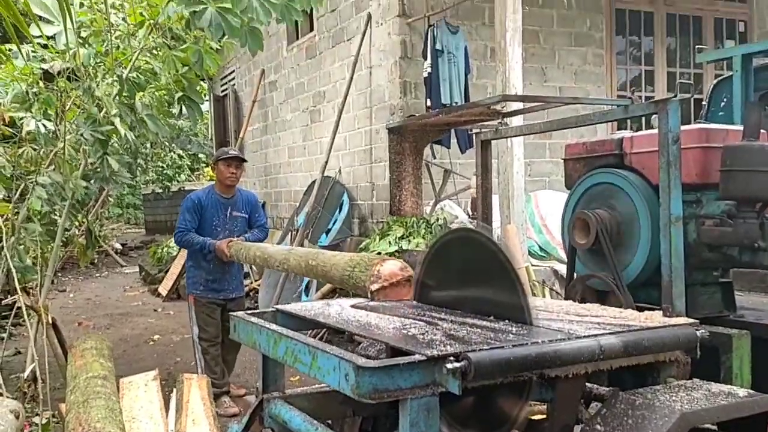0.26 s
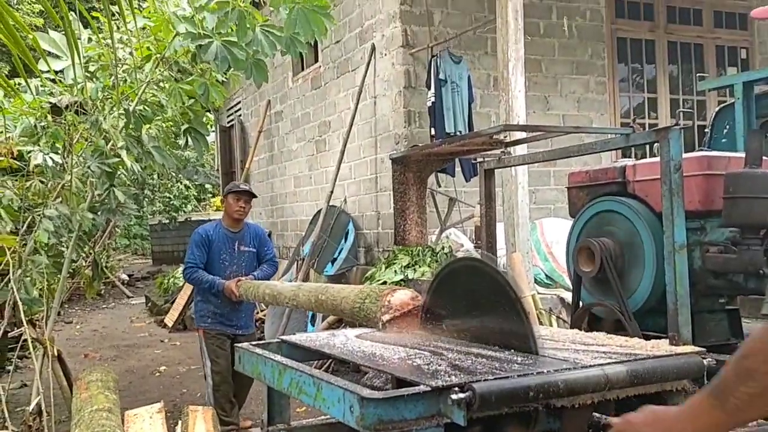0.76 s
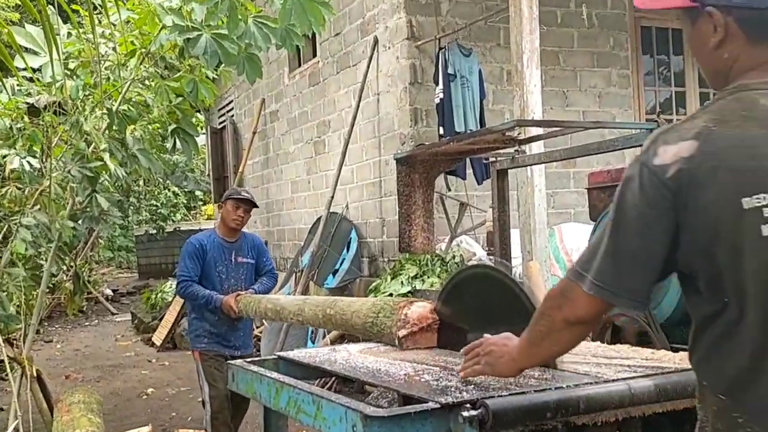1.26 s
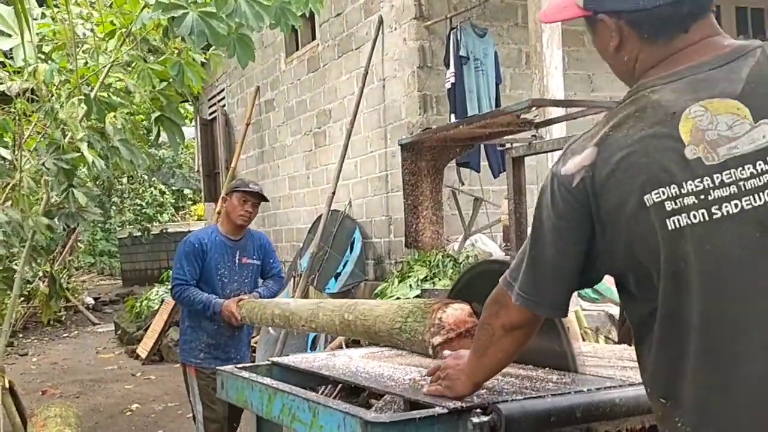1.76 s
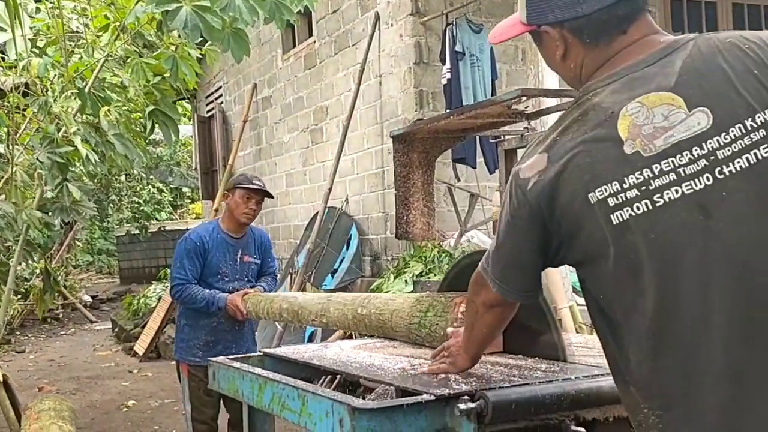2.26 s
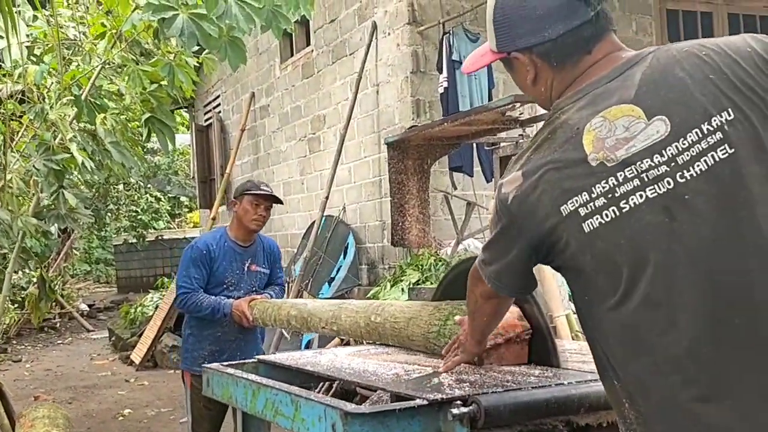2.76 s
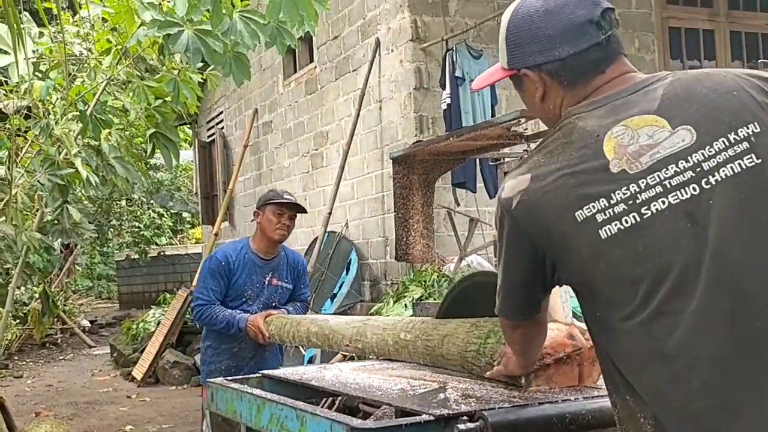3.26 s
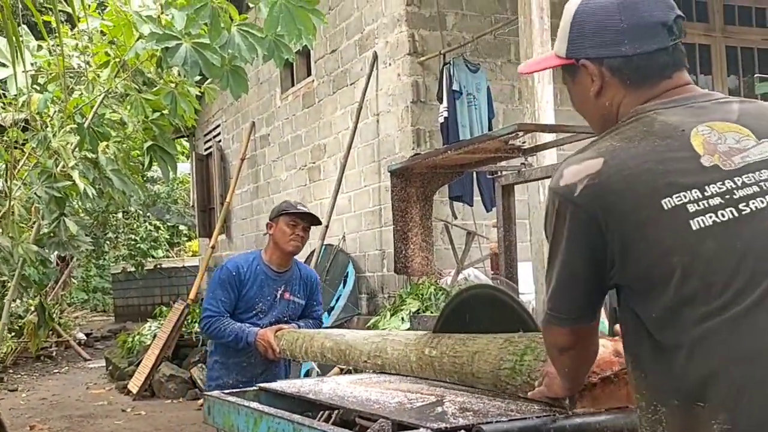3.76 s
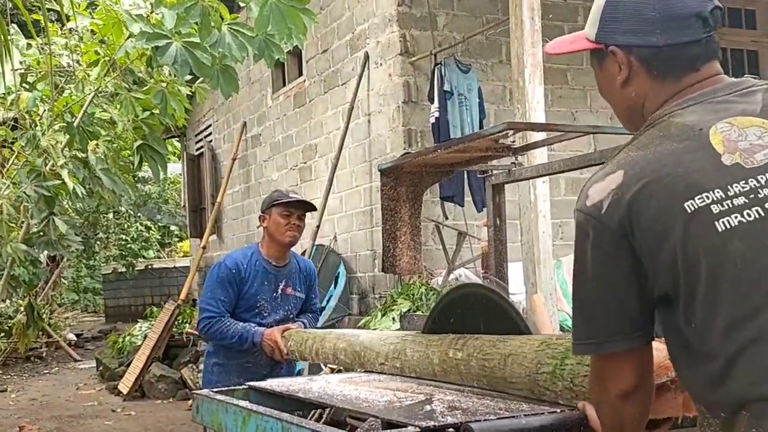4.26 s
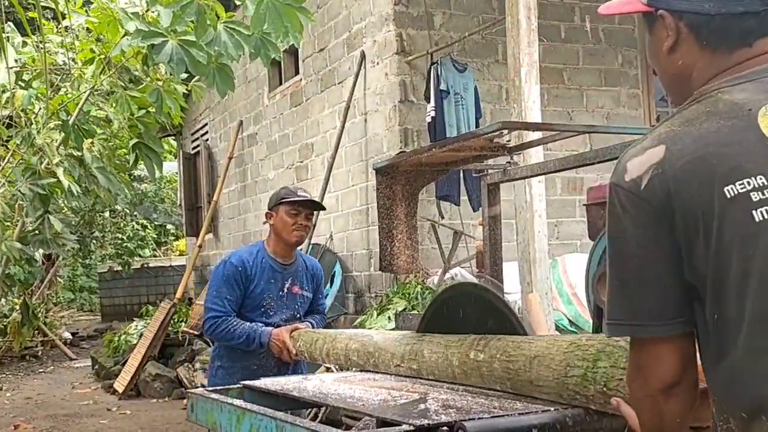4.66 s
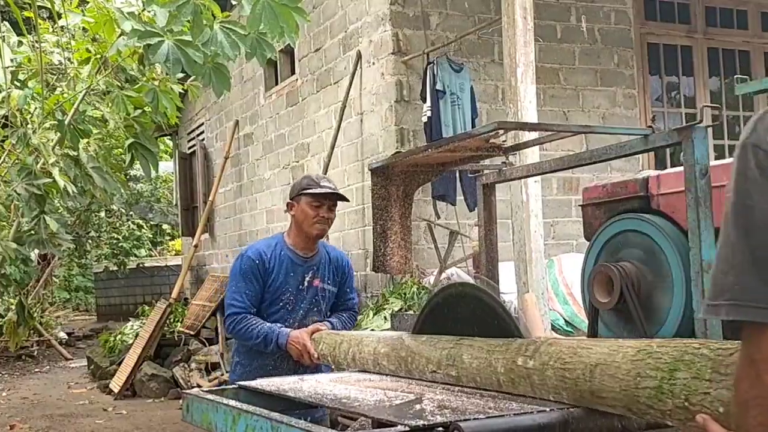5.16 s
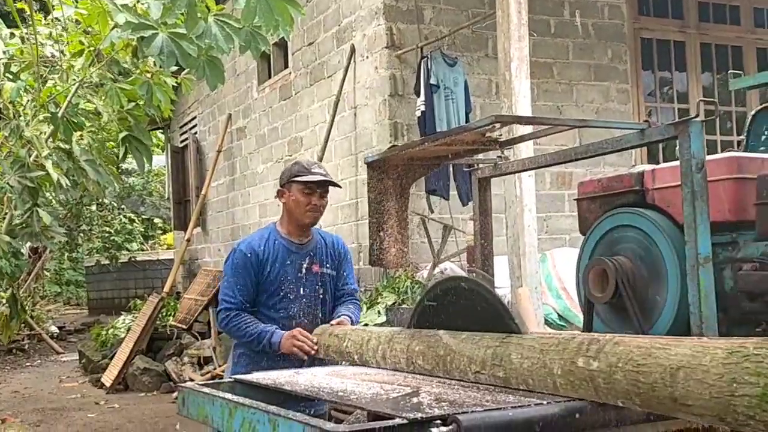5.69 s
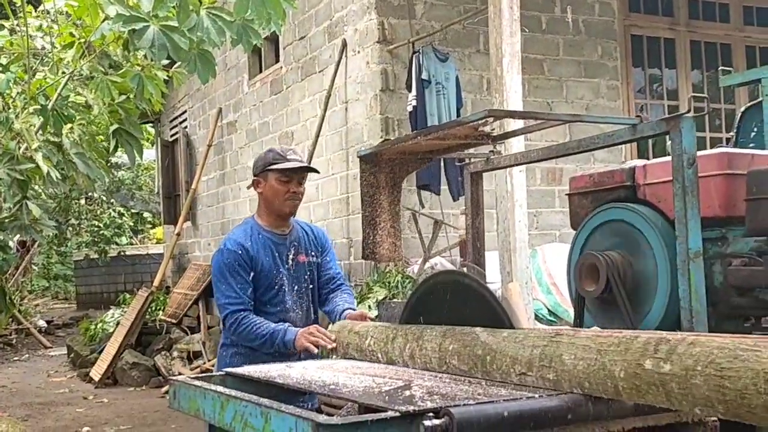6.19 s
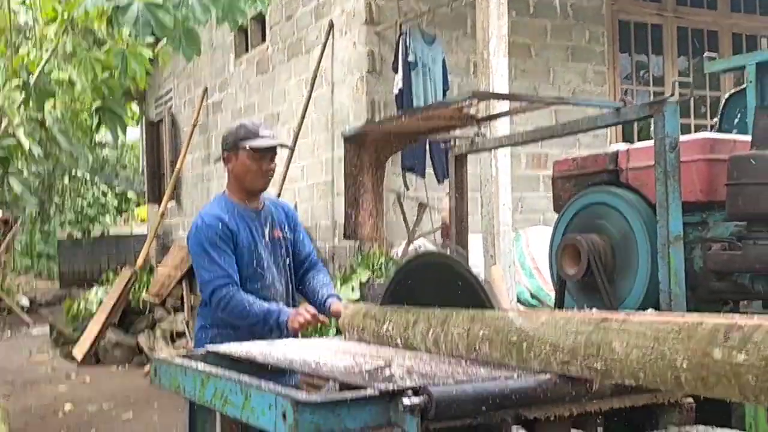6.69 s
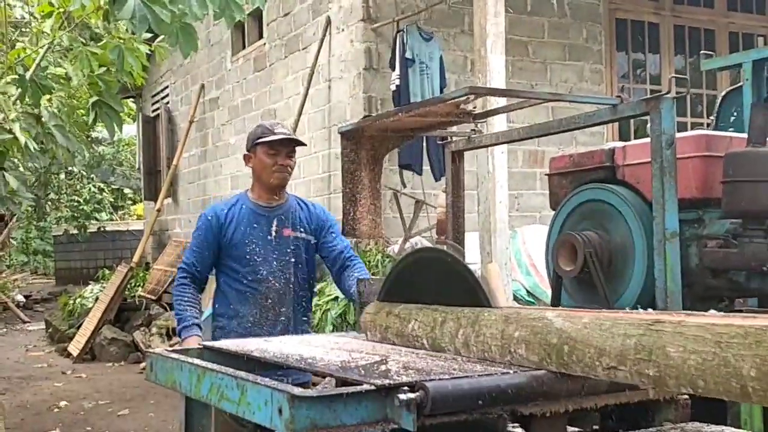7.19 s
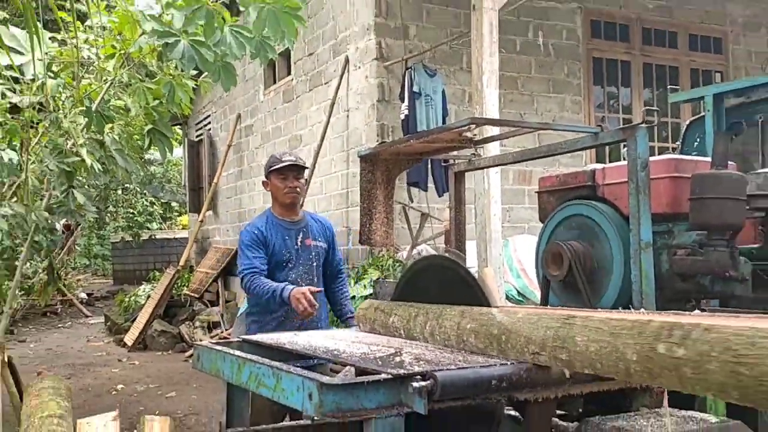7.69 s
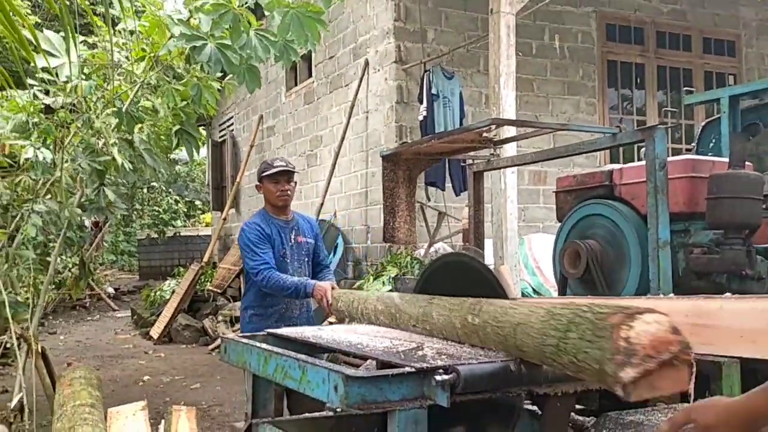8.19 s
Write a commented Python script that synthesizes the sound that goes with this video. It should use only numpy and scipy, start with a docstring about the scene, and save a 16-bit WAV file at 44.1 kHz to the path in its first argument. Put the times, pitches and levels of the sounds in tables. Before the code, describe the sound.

A single-cylinder diesel engine runs close by in an outdoor yard, thumping about twelve times a second with a metallic knock, gear and belt rattle and a wavering ring. Over it, from start to finish, a large circular saw hisses through a log, slightly to the right. At around 1.5 seconds the engine slows a little under load, and from 1.7 seconds its exhaust barks harder and unevenly, with a few sharp cracks until about 3 seconds. The labouring chug and the hiss continue, the hiss swelling briefly now and then. From about 5.7 to 8 seconds the log scrapes against the blade in several short, high rasps, and the blade rings thinly around 6.3 seconds and again from 7.3 seconds. From about 7 seconds the barking eases, the engine regains speed and its rattle grows louder, while the sawing moves to the centre.

```python
"""Diesel-driven circular saw ripping a log

A single-cylinder diesel belt-drives the blade in a yard beside a block wall. Each cycle brings an
exhaust thump, a rasping bark, an intake gulp and a combustion knock, over gear rattle and a wavering
engine ring. Under load the engine slows and barks harder. The teeth hiss in the wood, with brief swells,
and keep the blade ringing; the log scrapes now and then. A compressor ducks the loud barks."""
import sys
import numpy as np
from scipy import signal
from scipy.fft import irfft, next_fast_len
from scipy.io import wavfile
from scipy.ndimage import uniform_filter1d

SR = 44100
rng = np.random.default_rng(int(sys.argv[2]) if len(sys.argv) > 2 else 0)


def unload_audio(sound):
    """Save the sound as a 16-bit wav file, at the path given as the first command line argument."""
    columns = np.transpose(np.atleast_2d(sound))
    # keep every value between -1 and 1, then stretch to whole-number steps
    steps = np.round(np.clip(columns, -1, 1) * 32767)
    wavfile.write(sys.argv[1], SR, steps.astype(np.int16))


N = 372204
TIME_S = np.arange(N) / SR
N_FFT = next_fast_len(N, True)
FREQS_HZ = np.maximum(np.fft.rfftfreq(N_FFT, 1 / SR), 1)

# left-right coherence of noise: f/Hz, coherence
COHERENCE = [(30, 1), (100, 1), (350, 0.99), (650, 0.93), (1000, 0.65), (1600, 0.034), (15000, 0.035)]
# engine speed; sags under load, hunts under the governor: t/s, firing rate/Hz
FIRING_RATE = [(0.0, 12.118), (0.6, 12.013), (0.95, 11.989), (1.25, 11.701), (1.55, 11.284), (2.1, 11.281),
               (2.35, 11.813), (2.8, 11.618), (3.25, 11.64), (3.5, 11.827), (3.75, 11.66), (4.35, 11.957),
               (4.75, 11.676), (5.1, 11.742), (5.55, 11.944), (5.95, 11.724), (6.2, 11.914), (6.5, 11.773),
               (7.0, 11.932), (7.35, 12.331), (7.9, 12.169), (8.44, 12.256)]
# running noise of engine and belt drive: t/s, level/dB
RUNNING_LEVEL = [(0.15, -32), (1.58, -40), (2.4, -36), (2.7, -35.5), (3.6, -35.5), (4.0, -38), (4.5, -36.5),
                 (6.3, -36.5), (6.88, -33.5), (7.6, -29.5), (8.44, -30)]
# exposure of the inlet side to the listener: t/s, gain/dB
INLET_EXPOSURE = [(.4, 2.5), (1.2, 2.5), (1.8, -0.5), (5, 0.5), (6.9, -6), (8.4, -5.5)]
# gear and belt rattle: f/Hz, level/dB
RATTLE_SPECTRUM = [(15, -5), (35, 10), (110, 8.5), (300, 1), (420, -1), (700, 5.5), (1100, 3), (2000, 4),
                   (3000, -27), (5000, -38), (8000, -44), (15000, -41)]
# engine block ring: f/Hz, width/Hz, level/dB
BLOCK_MODES = [(839, 44, 2.5), (1021, 103, -4.5), (1547, 99, 0.5)]
# intake pipe ring: f/Hz, level/dB, t60/s
INTAKE_MODES = [(179.3, -9.5, 0.19), (266.4, 9, 0.049)]
# combustion knock and piston slap: f/Hz, level/dB, t60/s
KNOCK_MODES = [(703, -13, 0.032), (845, -1, 0.02), (980, -6, 0.039), (1470, -16, 0.014)]
# exhaust stroke strength: t/s, thump/dB, bark/dB
EFFORT = [(0, -35, -37), (.44, -32, -39), (.52, -20.5, -40), (1.2, -23.5, -44), (1.72, -22, -25.5),
          (2.3, -19.5, -21.5), (2.55, -19, -24), (3.15, -20, -22.5), (3.95, -20, -23.5), (4.5, -22.5, -25),
          (5.3, -21, -24), (5.55, -22, -27), (5.75, -24, -33.5), (6.15, -22.5, -23.5), (6.95, -22.5, -27),
          (7.3, -22, -32), (7.55, -23, -36), (8.1, -18.5, -29), (8.44, -28, -33)]
# single strokes the governor over- or underfuels: t/s, bark change/dB, thump change/dB
ODD_STROKES = [(0.03, -11, 11), (0.27, 11, 6), (0.69, 12, -12), (0.94, 0, -1.5), (1.19, -7, -3),
               (1.36, 7, 0), (1.54, 6, 1.5), (1.63, -5, 0.5), (1.72, -1.5, -1), (2.58, -8, -2),
               (2.67, -6, -0.5), (2.84, 1, -1.5), (3.01, -24, 1.5), (3.27, -21, -1), (3.53, -13, 0.5),
               (3.7, -6, 0), (4.38, -4, 0), (4.46, -16, 0.5), (4.63, -17, -1), (5.05, -6.5, 1.5),
               (5.65, -3.5, -1), (5.9, 4, 0), (6.32, -24, -4), (6.41, -10, -0.5), (6.75, 2.5, 0),
               (6.83, -5, -4), (7.08, 2, -3), (7.33, 6, 1), (7.41, -2, 2.5), (7.57, -13, 1), (7.66, 3, 1.5),
               (7.74, 2, -6), (7.82, 4, -9), (7.9, 0, 2.5), (8.07, -19, -5), (8.15, -6, 2.5),
               (8.31, -11, -11)]
# strokes with a fully steep front: t/s
STEEP_STROKES = [1.72, 2.76, 3.36, 4.55, 4.72, 5.14, 5.48, 6.24]
# exhaust jet rasp: f/Hz, level/dB
BARK_SPECTRUM = [(300, 5), (600, 1), (950, 8.5), (1200, -8), (1420, 18), (1850, 10.5), (3000, 11),
                 (5200, 6.5), (6500, -1), (8200, -17), (10200, -14), (15000, -36)]
# cracks at the silencer mouth: t/s, level/dB, f/Hz
CRACKS = [(1.72, -20.5, 2700), (2.245, -21, 2100), (2.33, -17.5, 2100), (2.417, -19, 5250),
          (3.1, -23.5, 1430)]
# log scrapes the blade or bumps the table: t/s, t60/s, level/dB, f/Hz
SCRAPES = [(5.685, 0.18, -25.5, 4400), (5.785, 0.25, -23, 4280), (6.41, 0.34, -22.5, 4150),
           (6.823, 0.077, -19.5, 4200), (7.507, 0.06, -21, 1400), (7.527, 0.098, -20.5, 4320),
           (7.59, .09, -26, 1350), (7.64, 0.29, -19.5, 4000), (7.815, 0.18, -25, 3700),
           (7.965, 0.16, -23.5, 4100)]
# log feed: t/s, hiss level/dB, top re body/dB
FEED = [(0, -27.5, -7.5), (.6, -26, -3.5), (1.0, -28, 1.5), (1.35, -28.5, 1.5), (1.7, -27.5, -2.5),
        (2.37, -25, -5), (3.4, -26.5, -4), (4.2, -26, -5.5), (4.9, -25.5, -1.5), (6.0, -26.5, -6),
        (6.6, -26.5, -4.5), (7.04, -25, -8.5), (7.14, -29.5, -16), (7.6, -27, -7), (8.2, -28.5, -10.5),
        (8.44, -30, -5)]
# brief swells of the saw hiss, mostly where a bark is weak: t/s, length/s, boost/dB
HISS_SWELLS = [(0.4, 0.15, 1.5), (1.08, 0.18, 0.5), (2.56, 0.4, 1.5), (3.523, 0.3, 2.5), (4.44, 0.12, 1),
               (5.683, 0.15, 2), (5.966, 0.12, 1.5), (6.365, 0.12, 0.5)]
# tooth hiss, body: f/Hz, level/dB
HISS_BODY_SPECTRUM = [(400, -28), (1200, -11), (2300, -2.5), (3100, 0.5), (3900, 3.5), (4800, 0.5),
                      (5800, -14), (7000, -15.5), (8200, -23.5), (11000, -29), (15000, -38)]
# tooth hiss, top: f/Hz, level/dB
HISS_TOP_SPECTRUM = [(3200, -17.5), (4400, 0.5), (5300, 4.5), (5900, 0.5), (7200, -10.5), (8200, -32),
                     (9200, -25.5), (10300, -18), (13500, -21.5), (15500, -29)]
# saw blade ring: f/Hz, width/Hz, level/dB
BLADE_MODES = [(2660, 180, -9), (3630, 125, -12), (4540, 190, -12.5), (5250, 860, -14.5)]
# log pinches the blade: peak t/s, half-width/s, mode f/Hz, boost/dB
PINCHES = [(2.74, 0.18, 2660, 3), (6.3, 0.15, 4540, 12), (6.4, 0.45, 3630, 3.5), (7.316, 0.18, 3630, 8),
           (8.0, 0.46, 3630, 10)]
# pan as the listener turns: t/s, right boost and left cut/dB
PAN = [(1.2, 1), (2.0, 0.93), (6.8, 0.65), (8.2, -0.11)]


def from_db(db):
    """Decibels to gain."""
    return np.exp(np.asarray(db) * (np.log(10) / 20))


def unit_rms(x):
    """Scale to unit power."""
    return x / np.sqrt(np.mean(x ** 2) + 1e-20)


def in_time(rows):
    """Table columns at every sample."""
    t_s, *columns = np.transpose(rows)
    return np.squeeze([np.interp(TIME_S, t_s, column) for column in columns])


def at_hz(rows):
    """Table at every FFT bin."""
    hz, value = np.transpose(rows)
    return np.interp(np.log(FREQS_HZ), np.log(hz), value)


def drift(rate_hz):
    """Random wander, unit RMS."""
    knots = rng.standard_normal(int(N / SR * rate_hz) + 2)
    return unit_rms(np.interp(TIME_S * rate_hz, np.arange(len(knots)), knots))


def noise(response):
    """Shaped stereo noise, unit RMS; coherent bass, diffuse treble."""
    mid, side = rng.standard_normal((2, 2 * len(FREQS_HZ))).view(complex)
    coherence = np.clip(at_hz(COHERENCE), -1, 1)
    spectrum = np.sqrt(1 + coherence) * mid + np.sqrt(1 - coherence) * side * [[1], [-1]]
    return unit_rms(irfft(response * spectrum, N_FFT)[:, :N])


def resonances(modes):
    """Response of parallel resonators, alternating in sign."""
    return sum((-1) ** k * from_db(db) / (1 + 1j * (FREQS_HZ ** 2 - hz ** 2) / (FREQS_HZ * width_hz))
               for k, (hz, width_hz, db) in enumerate(modes))


def delayed(x, delay_s):
    """Fractional delay."""
    return np.interp(TIME_S - delay_s, TIME_S, x, left=0)


def swell(clicks, rise_s, t60_s):
    """Attack-decay envelope per click."""
    age_s = TIME_S[:SR // 4]
    shape = (1 - np.exp(-age_s / rise_s)) * from_db(-60 * age_s / t60_s)
    return signal.oaconvolve(clicks, shape / shape.max())[:N]


def puff(clicks, width_s):
    """Gaussian gas pulse per click."""
    return signal.oaconvolve(clicks, signal.windows.gaussian(SR // 50, width_s * SR), "same")


def ring(clicks, hz, t60_s):
    """Decaying sine per click."""
    r, w = from_db(-60 / (t60_s * SR)), 2 * np.pi * hz / SR
    return signal.lfilter([0, np.sin(w)], [1, -2 * r * np.cos(w), r * r], clicks + 1e-18)


def pipe(x, hz, q):
    """Open pipe: resonant high-pass, radiates no steady flow."""
    w = 2 * np.pi * hz
    return signal.lfilter(*signal.bilinear([1, 0, 0], [1, w / q, w * w], SR), x)


def cycle_starts_s(first_s=0.0247):
    """Exhaust valve openings, one per cycle."""
    t_s, rate_hz = np.transpose(FIRING_RATE)
    clock_s = np.linspace(0, N / SR, 4000)
    cycles = np.cumsum(np.interp(clock_s, t_s, rate_hz)) * clock_s[1]
    cycles -= np.interp(first_s, clock_s, cycles)
    return np.interp(np.arange(int(cycles[-1]) + 1), cycles, clock_s)


def strokes(phase, gains):
    """One click per cycle; phase in cycles after the exhaust valve opens."""
    starts_s = cycle_starts_s()
    at = np.round((starts_s + phase * np.gradient(starts_s)) * SR).astype(int)
    inside = (at >= 0) & (at < N)
    return np.bincount(at[inside], gains[inside], N)


def uneven(spread_db):
    """Random gain per cycle."""
    return from_db(spread_db * rng.standard_normal(len(cycle_starts_s())))


def nearest_stroke(t_s):
    """Per-cycle mask: 1 at the stroke nearest t_s."""
    gap_s = np.abs(cycle_starts_s() - t_s)
    return 1.0 * (gap_s == gap_s.min())


def reflected(x, gain, paths_s=(0.0009, 0.0023, 0.0041)):
    """Comb from table, frame and log; paths wander as the listener moves."""
    echoes = [sum(delayed(side, path_s * (1 + 0.0728 * drift(4))) for path_s in paths_s) for side in x]
    return x + gain * np.array(echoes)


def engine_ring(running_db):
    """Wavering, throbbing ring near 830 Hz, strongest with the engine loud and exposed."""
    hz = 828 + 6.46 * drift(25)
    prominence_db = 0.56 * (running_db - running_db.max()) + in_time(INLET_EXPOSURE)
    throb_db = 5.5 * drift(20)
    return from_db(running_db + prominence_db + throb_db - 12) * np.sin(2 * np.pi * np.cumsum(hz) / SR)


def mechanism(running_db):
    """Valve taps ring the block over gear and belt rattle."""
    clicks = strokes(0.27, uneven(3.9)) + strokes(0.49, uneven(1.4)) + strokes(0.19, 0.8 * uneven(2.2))
    taps = swell(clicks, rise_s=0.00047, t60_s=0.007)
    block_db = 1.192 * running_db + 7.5 + in_time(INLET_EXPOSURE)
    block = from_db(block_db) * noise(resonances(BLOCK_MODES))
    rattle = from_db(running_db + 4.5 + 2.28 * drift(250)) * noise(from_db(at_hz(RATTLE_SPECTRUM)))
    return (1 + 0.36 * taps) * block + (0.86 + 0.05 * taps) * rattle


def knock(running_db):
    """Ignition knocks the block; the piston slaps the liner just after."""
    ignition = strokes(-0.203, uneven(1.2))
    slap = strokes(-0.124, from_db(-5.5) * uneven(1.5))
    clank = sum(from_db(db) * ring((ignition + slap) * from_db(1.2 * drift(12)), hz, t60_s)
                for hz, db, t60_s in KNOCK_MODES)
    return from_db(-23 + 0.95 * (running_db - running_db.max())) * clank


def intake(running_db):
    """The inlet valve gulps air on opening and rings the pipe again on closing."""
    clicks = strokes(0.2625, uneven(0.8)) - from_db(-9) * strokes(0.565, uneven(2.5))
    tone = sum(from_db(db) * ring(clicks, hz, t60_s) for hz, db, t60_s in INTAKE_MODES)
    tone_db = 1.456 * running_db + 20 + in_time(INLET_EXPOSURE)
    gulp = strokes(0.312, uneven(1.5)) - from_db(10.5) * strokes(0.582, uneven(0.86))
    flow = pipe(puff(gulp, width_s=0.0016), hz=52.7, q=0.45)
    return from_db(tone_db) * tone + from_db(0.5 * running_db - 14.5) * flow


def stroke_levels_db():
    """Thump and bark per stroke: effort, odd strokes, slight scatter."""
    starts_s = cycle_starts_s()
    t_s, *efforts_db = np.transpose(EFFORT)
    thump_db, bark_db = (np.interp(starts_s, t_s, db) for db in efforts_db)
    scatter_db = 0.8 * rng.uniform(-1, 1, len(starts_s))
    for odd_s, bark_change_db, thump_change_db in ODD_STROKES:
        bark_db += bark_change_db * nearest_stroke(odd_s)
        thump_db += thump_change_db * nearest_stroke(odd_s)
    return thump_db + scatter_db, bark_db + scatter_db


def exhaust(thump_db, bark_db):
    """Blow-down thumps through the silencer; steep fronts of hard strokes ring its overtone."""
    soft_width_s, steep_width_s, fully_steep_db = 0.0013, 0.00071, -16.5
    force = from_db(thump_db + 2.5)
    steepness = np.minimum(from_db(bark_db - fully_steep_db), 1)
    for t_s in STEEP_STROKES:
        steepness = np.maximum(steepness, nearest_stroke(t_s))
    soft = puff(strokes(-0.0064, force * (1 - steepness)), soft_width_s)
    steep = puff(strokes(-0.0088, force * steepness), steep_width_s)
    push = soft + steep * soft_width_s / steep_width_s   # equal pulse area
    push += 0.32 * delayed(push, 0.0036)   # ground bounce hollows the upper bass
    overtone = ring(strokes(0, force * steepness * from_db(-7.5)), hz=164, t60_s=0.078)
    return pipe(pipe(push, hz=66.6, q=2.16), hz=32.2, q=1.0) - overtone


def bark(bark_db):
    """The exhaust jet rasps at each stroke, direct and off the wall."""
    rasp = from_db(at_hz(BARK_SPECTRUM))
    jet = swell(strokes(0.0005, from_db(bark_db + 7)), rise_s=0.0016, t60_s=0.04)
    jet *= from_db(1.1 * drift(700))
    wall = swell(strokes(0.074, from_db(bark_db + 0.5)), rise_s=0.003, t60_s=0.068)
    return jet * noise(rasp) + wall * noise(rasp * (FREQS_HZ / 3000) ** 0.31)


def cracks():
    """The hardest strokes crack at the silencer mouth: brief, broad noise bursts."""
    out = 0
    for t_s, db, hz in CRACKS:
        burst = swell(strokes(0.004, from_db(db) * nearest_stroke(t_s)), rise_s=0.0012, t60_s=0.055)
        out += burst * noise(resonances([(hz, 0.4 * hz, 0)]) ** 2)
    return out


def scrapes():
    """Wood rubs on steel: short, rough bands of noise."""
    friction = rng.standard_normal((2, N)) * from_db(drift(310))
    out = 0
    for t_s, t60_s, db, hz in SCRAPES:
        click = np.bincount([round(t_s * SR)], [from_db(db)], N)
        band = signal.butter(2, [0.88 * hz, 1.12 * hz], "band", fs=SR, output="sos")
        out += swell(click, t60_s / 10, t60_s) * unit_rms(signal.sosfilt(band, friction))
    return out


def hiss_swells_db(edge_s=0.067):
    """Brief swells of the saw hiss: each builds, holds, eases."""
    return sum(db * np.clip(np.minimum(TIME_S - t_s, t_s + length_s - TIME_S) / edge_s + 0.5, 0, 1)
               for t_s, length_s, db in HISS_SWELLS)


def hiss_ripple_db():
    """The hiss dips and swells once per engine cycle."""
    starts_s = cycle_starts_s()
    cycles = np.interp(TIME_S, starts_s, np.arange(len(starts_s)))
    return 0.72 * np.cos(2 * np.pi * (cycles - 0.06))


def pinches_db(hz):
    """Each pinch by the log swells one blade mode, then fades."""
    return sum(db * np.exp(-((TIME_S - t_s) / half_width_s) ** 2)
               for t_s, half_width_s, mode_hz, db in PINCHES if abs(mode_hz / hz - 1) < 0.1)


def saw():
    """Teeth tear fibres in quick, uneven bites; the blade rings faintly."""
    feed_db, top_db = in_time(FEED)
    grain_db = 0.8 * drift(9)   # harder and softer wood
    tearing_db = 0.7 * drift(90) + 0.7 * drift(900)
    level_db = feed_db + hiss_swells_db() + grain_db + hiss_ripple_db() + tearing_db
    body = noise(from_db(at_hz(HISS_BODY_SPECTRUM)))
    top = from_db(top_db + 0.5 + 1.4 * drift(70)) * noise(from_db(at_hz(HISS_TOP_SPECTRUM)))
    blade = 0
    for hz, width_hz, db in BLADE_MODES:
        mode_db = db - 1 + pinches_db(hz) + 2.4 * drift(24)
        blade += from_db(mode_db) * noise(resonances([(hz, width_hz, 0)]) ** 2)
    return from_db(level_db) * (body + top + blade)


def scene():
    """Engine ahead; saw, bark, cracks and scrapes slightly right until the listener turns."""
    running_db = in_time(RUNNING_LEVEL)
    pan_db = np.array([[-1], [1]]) * in_time(PAN)
    thump_db, bark_db = stroke_levels_db()
    engine = exhaust(thump_db, bark_db) + intake(running_db)
    engine = engine + mechanism(running_db) + knock(running_db) + engine_ring(running_db)
    rasping = reflected(bark(bark_db) + saw(), gain=0.3)
    return engine * from_db(0.059 * pan_db) + (rasping + cracks() + scrapes()) * from_db(pan_db)


def compressor(x, threshold_db=-21, slope=0.64, attack_s=0.035, release_db_per_s=50.5, makeup_db=1.5):
    """Gain ducks after each loud bark and creeps back."""
    power = uniform_filter1d(np.mean(x ** 2, axis=0), size=220)
    level_db = 10 * np.log10(np.maximum(power, 1e-12))
    fall_db = release_db_per_s * TIME_S
    held_db = np.maximum.accumulate(level_db + fall_db) - fall_db
    over_db = np.maximum(held_db - threshold_db, 0)
    pole = np.exp(-1 / (attack_s * SR))
    return x * from_db(makeup_db - slope * signal.lfilter([1 - pole], [1, -pole], over_db))


def record(dry):
    """Compressor, then a steep low-pass."""
    cutoff_hz = 15100
    lowpass = signal.ellip(10, 0.2, 80, cutoff_hz, fs=SR, output="sos")
    return signal.sosfilt(lowpass, compressor(dry))


dry = scene()
out = record(dry)
unload_audio(out)
```